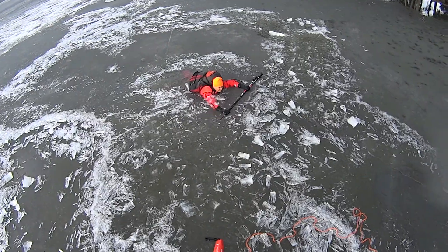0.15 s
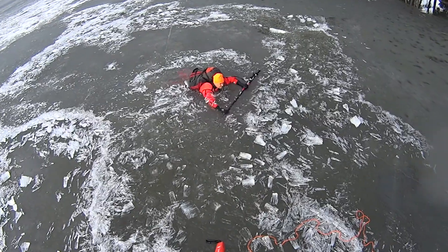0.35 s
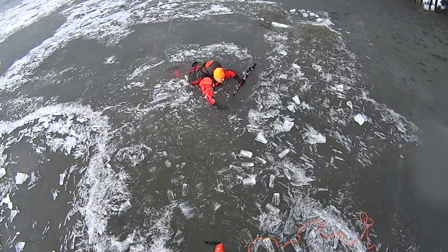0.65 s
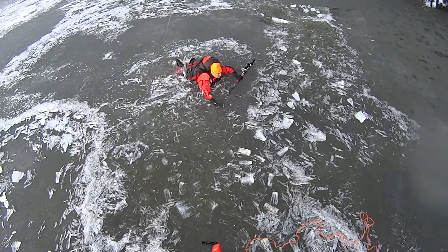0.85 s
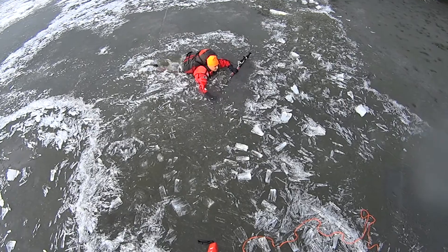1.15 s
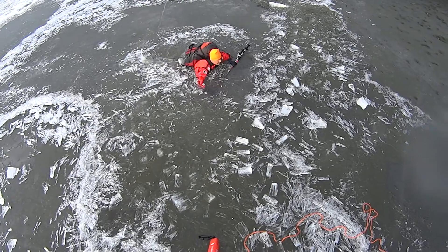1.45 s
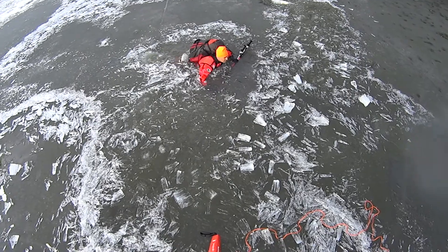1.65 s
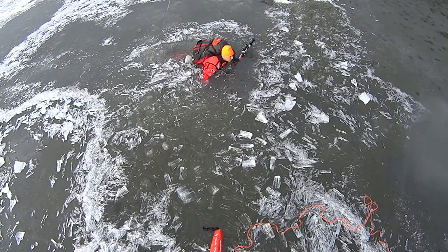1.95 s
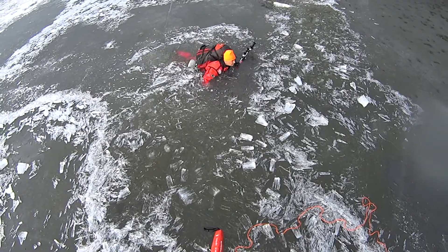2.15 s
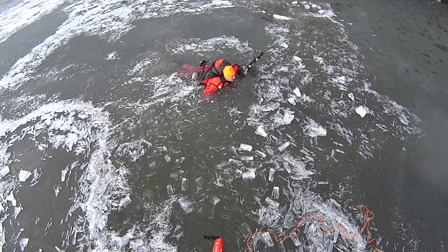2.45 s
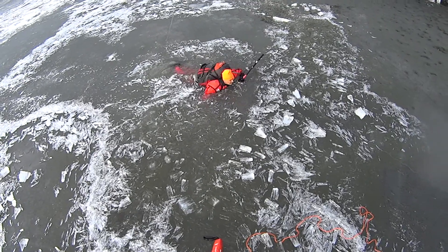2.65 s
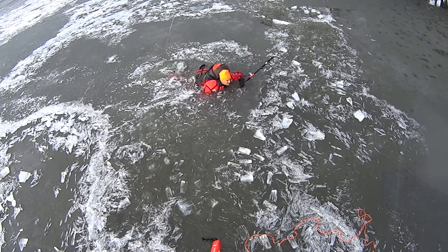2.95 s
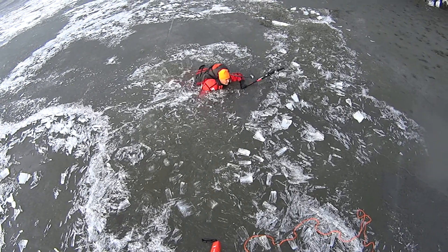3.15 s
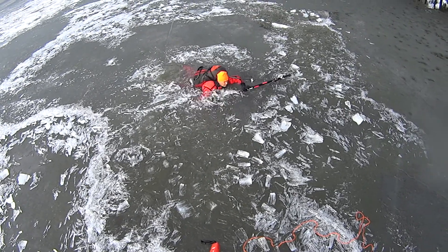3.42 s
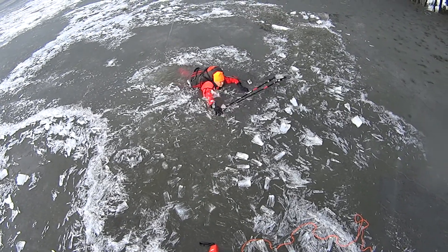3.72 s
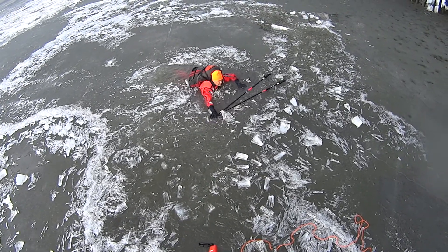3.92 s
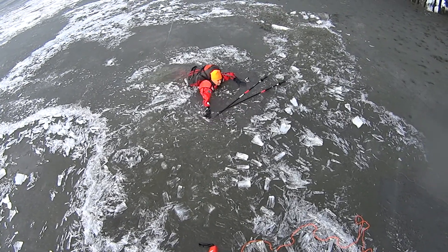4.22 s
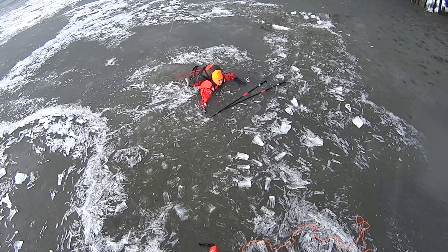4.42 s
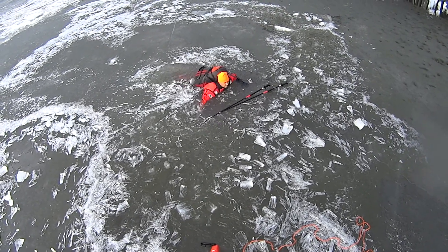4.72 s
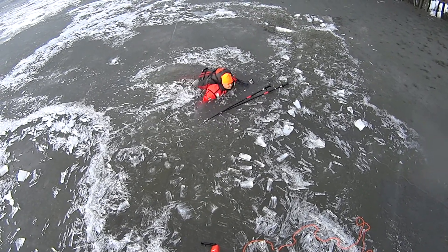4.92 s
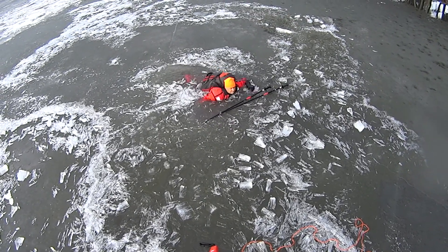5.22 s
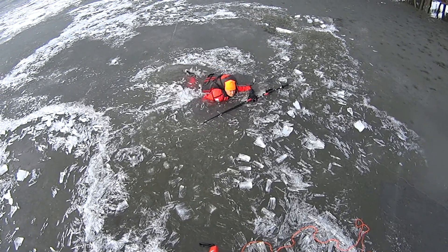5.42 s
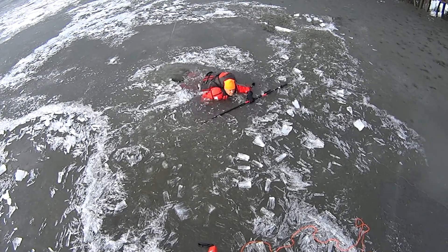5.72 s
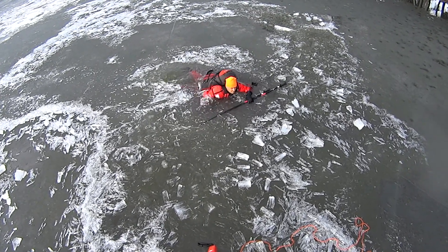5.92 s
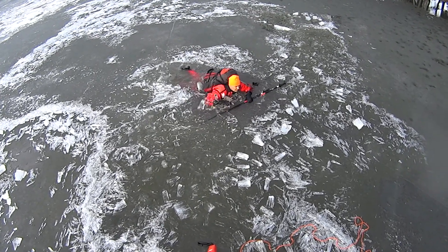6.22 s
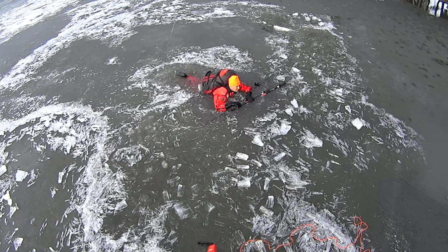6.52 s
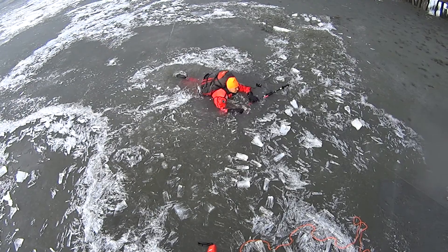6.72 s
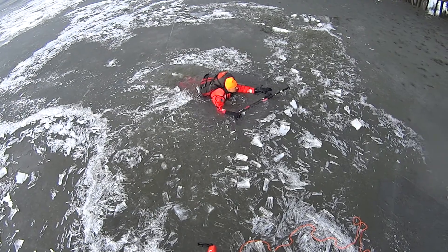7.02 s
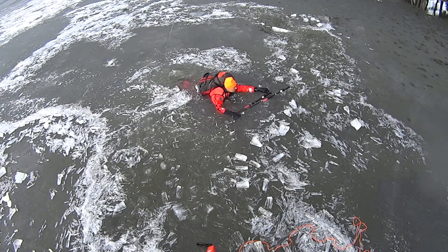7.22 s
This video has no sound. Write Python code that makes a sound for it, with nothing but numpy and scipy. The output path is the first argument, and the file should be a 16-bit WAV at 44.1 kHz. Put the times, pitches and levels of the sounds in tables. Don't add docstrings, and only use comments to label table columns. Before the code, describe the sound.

Close, slightly boxed-in stereo sound of icy open water. Slush rustles, ice pieces click and ring briefly, and air bubbles plop as a swimmer pushes through. Activity opens with taps and rubbing on the mount, drops to a lull around two seconds, then surges repeatedly between three and six seconds before easing into lighter stirring. Soft wind and hull rumble and constant microphone hiss continue throughout.

```python
import sys
import numpy as np
from scipy import signal
from scipy.fft import rfft, irfft, next_fast_len
from scipy.io import wavfile
from scipy.ndimage import uniform_filter1d, map_coordinates

SR = 44100
rng = np.random.default_rng(int(sys.argv[2]) if len(sys.argv) > 2 else 0)


def transcribe(u):
    v = np.clip(np.atleast_2d(u).T, -1, 1)
    q = np.round(v * 32767).astype(np.int16)
    wavfile.write(sys.argv[1], SR, q)


def invert_db(level):
    return 10 ** (np.asarray(level, dtype=float) / 20)


N = 325017


def unit(x):
    return x / np.sqrt(np.mean(x ** 2) + 1e-20)


def along(points, hz):
    f, v = np.transpose(points)
    return np.interp(np.log(hz + 1), np.log(f + 1), v)


def curves(rows):
    s, *columns = np.transpose(rows)
    return [np.interp(np.arange(N) / SR, s, column) for column in columns]


def wobble(rate):
    knots = rng.standard_normal(int(N * rate / SR) + 4)
    return map_coordinates(knots, [np.arange(N) * rate / SR])


def filtered(x, response):
    m = next_fast_len(N + 8192)
    return irfft(rfft(x, m) * response(np.fft.rfftfreq(m, 1 / SR)), m)[..., :N]


def resonant(modes):
    def response(f):
        total = 0
        for k, (centre, width, db) in enumerate(modes):
            damping = 1j * f * width
            total = total + (-1) ** k * invert_db(db) * damping / (centre ** 2 - f ** 2 + damping)
        return total
    return response


def patchy(depth_db):
    z = signal.stft(rng.standard_normal((2, N)), nperseg=256)[2]
    field = rng.standard_normal(z.shape[1:])
    field = uniform_filter1d(field, size=4, axis=0)
    field = uniform_filter1d(field, size=5, axis=1)
    return unit(signal.istft(z * invert_db(depth_db * unit(field)), nperseg=256)[1][:, :N])


def bursts(s, hz, cycles, gain, rise, size):
    t = np.arange(size) / SR
    age = t * (hz / cycles)[:, None]
    tone = np.sin(2 * np.pi * hz[:, None] * t * (1 + rise * age / 2))
    swell = np.e * 3 * age * np.exp(-3 * age)
    rows = gain[:, None] * swell * tone
    at = (s * SR).astype(int)[:, None] + np.arange(size)
    return np.bincount(at.ravel(), rows.ravel(), N + size)[:N]


def grains(count, centre_hz, spread, cycles, scatter_db, rise, size):
    when, pitch, life, big = rng.random((4, count))
    hz = np.clip(centre_hz * np.exp(spread * (2 * pitch - 1)), 300, 12000)
    sizes = invert_db(np.minimum(-scatter_db * np.log(big), 14))
    return unit(bursts(when * N / SR, hz, cycles * (.5 + life), sizes, rise, size))


# time in seconds, strength in dB,
# depth (low slosh against ice rustle) in dB.
STIRRING = [(0, -36.5, -5), (.61, -47.5, -7), (.85, -45, -1), (1.76, -44.5, -4.5), (1.93, -50, -4),
            (2.77, -49.5, -11.5), (2.92, -40, -3), (3.6, -34, -9), (3.95, -47, -20), (4.23, -47.5, -9),
            (4.42, -37.5, -4.5), (4.79, -44.5, -11), (5.26, -32.5, -6), (5.77, -41.5, -4),
            (6.19, -34.5, -5.5), (6.42, -42.5, -3), (6.82, -47.5, -4.5), (7.37, -44.5, -6.5)]
# start in seconds, strength in dB, dying time in seconds, depth in dB.
STROKES = [(0.162, -30, 0.058, -3), (0.423, -39, 0.025, 3.5), (0.648, -32, 0.023, -3),
           (0.751, -27.5, 0.046, -4), (1.046, -33, 0.15, -5), (1.24, -34.5, 0.13, -2),
           (2.321, -41.5, 0.15, -7), (2.421, -43, 0.2, -9), (2.584, -43.5, 0.18, -6),
           (3.192, -26.5, 0.062, -4.5), (3.262, -34, 1, -5), (3.573, -31.5, 0.14, -3.5),
           (3.673, -20, 0.04, -5.5), (3.775, -20.9, 0.043, -6.5), (4.845, -25.5, 0.026, -4.5),
           (5.093, -27.5, 0.077, -5.5), (5.328, -29, 0.03, 0.5), (5.541, -43.5, 0.122, 1),
           (5.6, -30.5, 0.087, -12.8), (5.734, -26.5, 0.033, -4.5), (5.961, -31, 0.062, -11),
           (6.026, -24.5, 0.025, -7.1), (6.498, -36.5, 0.36, -6.5), (6.532, -28, 0.022, 2.2),
           (6.672, -29.5, 0.042, -0.5), (6.761, -32, 0.022, -8), (7.113, -35, 0.034, -5),
           (7.196, -34, 0.063, -11)]
STROKE_RISE_S, WATER_DB = 0.049, -2
SPRAY_DB, SPRAY_PER_DEPTH = -6, -0.22
GURGLE_DB, GURGLE_PER_DEPTH = -9, 2.04


def stirring():
    def shares(depth_db):
        gurgle = GURGLE_DB + GURGLE_PER_DEPTH * depth_db
        spray = SPRAY_DB + SPRAY_PER_DEPTH * depth_db
        return np.array([gurgle, depth_db, 0 * depth_db, spray])

    strength_db, depth_db = curves(STIRRING)
    power = invert_db(strength_db + shares(depth_db)) ** 2
    t = np.arange(2 * SR) / SR
    for s, db, dying, depth_db in STROKES:
        swell = (1 - np.exp(-t / STROKE_RISE_S)) * np.exp(-t / max(dying, .01))
        rest = power[:, round(s * SR):][:, :len(t)]
        rest += (invert_db(db + shares(depth_db))[:, None] * swell[:rest.shape[1]]) ** 2
    return invert_db(WATER_DB) * np.sqrt(power)


# frequency in Hz, density in dB per Hz.
HOUSING = [(500, -62), (900, -29.5), (1250, -22.5), (2130, -6), (3050, -11.5), (3600, -8), (4200, -6.5),
           (4900, 2.5), (5500, -4.5), (6900, -10), (9000, -8.5), (9750, -19.5), (10250, -18.5),
           (11000, -25)]
# frequency in Hz, density in dB per Hz.
BETWEEN_PORTS = [(500, -49), (1300, -31), (2130, -21.5), (3000, -25), (4100, -18), (4600, -20), (5050, -16),
                 (5500, -19), (5900, -18.5), (6600, -20), (7100, -18.5), (8000, -32), (9200, -16.5),
                 (9800, -34.5)]
RANGE_EDGES_HZ = (1450, 3300, 6800)


def water():
    wash, wide = patchy(depth_db=1.27)
    bubbles = grains(4000, centre_hz=1994, spread=0.571, cycles=19.8, scatter_db=2.0, rise=0.11, size=500)
    chips = grains(16000, centre_hz=5460, spread=0.927, cycles=3.8, scatter_db=-0.5, rise=0, size=64)
    tinkles = grains(3000, centre_hz=7637, spread=.3, cycles=73, scatter_db=-1, rise=0.016, size=800)
    cracks = grains(1800, centre_hz=8150, spread=0.28, cycles=9.3, scatter_db=2.5, rise=0, size=96)
    near = wash + invert_db(-13) * cracks + invert_db(-12.5) * bubbles + invert_db(-11.5) * chips + invert_db(-11.0) * tinkles
    sources = np.array([near, wide])

    def colour(hz):
        return invert_db([along(HOUSING, hz), along(BETWEEN_PORTS, hz)])

    def below(hz):
        deep, low, high = [1 / (1 + (hz / edge) ** 8) for edge in RANGE_EDGES_HZ]
        return [deep, low - deep, high - low, 1 - high]

    lapping = invert_db(0.1 * wobble(16) + 0.57 * wobble(40))
    mid_side = np.zeros((2, N))
    for k, level in enumerate(stirring()):
        part = filtered(sources, lambda hz: colour(hz) * below(hz)[k])
        mid_side += level * lapping * unit(part) * np.sqrt(2)
    mid, side = mid_side
    return np.array([mid + side, mid - side])


# time in seconds, peak in dB, pitch in Hz, spread of pitch from 0 to 1.
GULPS = [(0.184, -3.5, 2100, 0.23), (0.449, -24, 1434, 0.2), (0.7756, -15, 2060, 0.15),
         (1.234, -18, 1690, 0.3), (2.9407, -7, 1950, 0.15), (3.189, -3.5, 2180, 0.1),
         (3.2241, -4, 2250, 0.25), (3.4521, -2.5, 2015, 0.15), (3.7269, 0, 1960, 0.12),
         (3.7962, -2.5, 2320, 0.1), (3.867, -10, 2240, 0.06), (4.336, -7, 1795, 0.02),
         (4.4074, 1, 1874, 0.22), (4.492, -4, 2870, 0.15), (4.8678, -1.5, 2016, 0.25),
         (5.168, -11, 2270, 0.15), (5.3497, -14, 2120, 0.15), (5.606, -4, 2500, 0.1),
         (5.6433, -3, 3230, 0.15), (5.8346, -11, 2200, 0.05), (5.894, -15, 2040, 0.1),
         (5.9693, -17, 2060, 0.15), (6.0322, -9, 2020, 0.05), (6.297, -3, 3530, 0.03),
         (6.547, -9, 1900, 0.15), (6.69, -10, 1885, 0.25)]
# level in dB, scatter in seconds.
SWARM = (-37, 0.012)


def plops():
    s, db, hz, spread = np.transpose(GULPS)
    small_db, scatter_s = SWARM
    pitches, delays = rng.uniform(-1.063, 1, (2, 5, len(s)))
    sound = bursts(s - .004, hz, 29.0, invert_db(db - 29.5), 0.05, size=1500)
    for pitch, late in zip(pitches, delays):
        small_hz = hz * np.exp(spread * pitch)
        sound += bursts(s + scatter_s * late / 2, small_hz, 30, invert_db(db + small_db), 0.041, size=1200)
    return sound


# time in seconds, peak in dB, ring in Hz, splinters against the peak in dB.
CLINKS = [(0.0298, -7.5, 4500, -12), (1.0897, -8, 5440, -3), (1.3264, -10, 4990, -24),
          (2.387, -13, 4750, -18), (2.4409, -13, 4960, -12), (3.0795, -15, 6010, -8),
          (3.2196, -11, 4630, -9), (3.3957, -14, 4800, 9), (3.6217, 1, 4650, -19), (3.7998, 3, 5050, -12.5),
          (3.8706, -6, 4970, -16), (4.0045, -12, 6200, -6), (4.3196, -8.5, 4970, -10),
          (4.5775, -10, 4910, -5), (4.8419, -13, 4750, -10), (5.1297, -7, 5060, -16),
          (5.2155, -1, 4900, -20), (5.25, -3, 4930, -22), (5.349, -8, 4800, 0), (5.463, -4.5, 5070, -7),
          (5.9666, -10, 4600, -6), (6.0467, -5, 4990, -8), (6.254, -13, 4510, -2), (6.783, -7, 4580, -14),
          (6.3594, -5.5, 4940, -24), (6.539, -13, 4870, -7), (6.7062, -8, 4920, -17),
          (7.0244, -11, 5180, -5), (7.144, -9, 5080, -14), (7.222, -19, 4800, 5)]
SPLINTERS_DB = -14


def clinks():
    s, db, hz, splinter_db = np.transpose(CLINKS)
    delays, pitches = rng.random((2, 6, len(s)))
    sound = bursts(s - .003, hz, 54, invert_db(db - 20), 0, size=800)
    gain = invert_db(db + splinter_db + SPLINTERS_DB)
    for late, pitch in zip(delays, pitches):
        sound += bursts(s - .001 + 0.0063 * late, 3800 + 5400 * pitch, 3.6, gain, 0, size=400)
    return sound


# time in seconds, peak in dB, bright part against the peak in dB.
TAPS = [(0.055, -57, 3), (0.082, -51, -5), (0.118, -46, 1), (0.161, -49, 2), (0.245, -43, -3),
        (0.276, -39, -5), (0.288, -31.5, 3.5), (0.319, -51, -5), (0.359, -48, 1), (0.387, -37.5, 4),
        (0.401, -42, -7), (0.447, -28.5, -0.5), (0.477, -41, 0), (0.558, -51, -7), (0.636, -42.5, 0),
        (0.667, -48, 6), (0.768, -61, 1), (1.175, -41.5, 2), (1.294, -55, 3), (1.453, -48, 5),
        (1.594, -51, 2), (1.709, -50, 7), (1.776, -47, -2), (2.503, -55, 12), (3.26, -61, 8),
        (4.622, -46, 7), (4.738, -58, 0), (6.178, -57, 18), (6.576, -60, 20)]
# frequency in Hz, width in Hz, level in dB.
MOUNT = [(150, 100, 1.5), (315, 81, 3.5), (533, 187, 8), (706, 144, 3.5)]
# frequency in Hz, width in Hz, level in dB.
SHELL = [(1100, 360, 1), (1610, 500, -1)]


def taps():
    s, db, bright_db = np.transpose(TAPS)
    size = 600
    t = np.arange(size) / SR
    at = ((s * SR).astype(int)[:, None] + np.arange(size)).ravel()
    rough = rng.standard_normal((len(s), 3, size)) * invert_db(-60 * t / 0.054) * (1 - np.exp(-t / 0.00072))
    rough[:, :, [40, 120]] += [[-2.5, -2.3], [5.0, 0.99], [-3.0, -2.4]]
    rough = rough / np.linalg.norm(rough, axis=2, keepdims=True)

    def blows(k, level_db):
        return np.bincount(at, (invert_db(level_db)[:, None] * rough[:, k]).ravel(), N + size)[:N]

    right, own = filtered(np.array([blows(0, db + 34.0), blows(1, db + 32)]), resonant(MOUNT))
    edge = filtered(blows(2, db + bright_db + 29), lambda hz: resonant(SHELL)(hz) ** 2)
    return np.array([own - 0.073 * right, right]) + edge


# time in seconds, rubbing level in dB.
GRIP = [(0, -65), (.31, -51), (.65, -70), (.9, -61), (1.55, -60.5), (2, -73), (2.75, -69), (3.2, -61),
        (4, -68), (6, -64.5), (6.4, -64.5), (7.37, -66)]


def rubbing():
    level = invert_db(curves(GRIP)[0] - 4.5 + 5.0 * wobble(30))
    return level * unit(filtered(rng.standard_normal((2, N)), resonant(MOUNT)))


# time in seconds, rumble level in dB.
WIND = [
    (0, -51.5),
    (.25, -51.5),
    (.43, -41),
    (.6, -51.5),
    (1.8, -51.5),
    (4, -53.5),
    (5.4, -53),
    (7.37, -57),
]
# frequency in Hz, density in dB per Hz.
RUMBLE = [(12, -2), (20, 3.5), (32, -1.5), (72, -6), (156, -17.5), (219, -24), (400, -27.5), (520, -37),
          (880, -120)]
# time in seconds, peak in dB, pitch in Hz.
THUMPS = [(0.139, -51, 72.7), (0.288, -44, 78.1), (0.388, -50, 78.5), (0.833, -48, 74.4),
          (1.538, -43.5, 72), (2.268, -48.5, 72.7), (2.509, -53, 74), (3.961, -44.5, 120),
          (4.6, -47.5, 131), (4.841, -49, 85.5), (5.393, -67, 94.2), (5.548, -46.5, 143),
          (5.889, -49.5, 149), (6.854, -51, 124)]


def rumble():
    def colour(hz):
        return invert_db(along(RUMBLE, hz)) * [hz > 0, hz / (hz + 90)]

    both, apart = filtered(rng.standard_normal((2, N)), colour)
    both = unit(invert_db(1.5 * wobble(13)) * both)
    apart = invert_db(-23 + 3.2 * wobble(15)) * unit(apart)
    s, db, hz = np.transpose(THUMPS)
    thumps = bursts(s - .008, hz, 4.0, invert_db(db - 3.5), 0, size=4000)
    level = invert_db(curves(WIND)[0] + 0.65 * wobble(5))
    return level * np.array([both + apart, both - apart]) + thumps


# frequency in Hz, density in dB per Hz.
HISS = [(40, -28), (150, 1), (450, 4.5), (1000, 5.5), (2000, 4), (5000, -0.5), (9000, -10), (11200, -36)]
# frequency in Hz, half the ratio of out of step over in step in dB.
OPPOSED = [(100, -1), (300, 2.5), (600, 3.5), (1200, 2.5)]


def hiss():
    def colour(hz):
        return invert_db(along(HISS, hz) + along(OPPOSED, hz) * [[-1], [1]])

    mid, side = filtered(rng.standard_normal((2, N)), colour)
    return invert_db(-54.0) * unit(np.array([mid + side, mid - side]))


# frequency in Hz, left over right in dB.
TILT = [(1000, -1.5), (3000, -0.5), (5000, 0), (8000, -1)]


def scene():
    wet = water() + plops() + clinks()
    wet = filtered(wet, lambda hz: invert_db(along(TILT, hz) * [[.5], [-.5]]))
    return wet + taps() + rubbing() + rumble() + hiss()


def top_cut(x):
    return signal.sosfilt(signal.butter(12, 11510, fs=SR, output="sos"), x)


def record(dry):
    top_hz = 11070
    return top_cut(filtered(dry, lambda hz: hz < top_hz))


dry = scene()
out = record(dry)
transcribe(out)
```